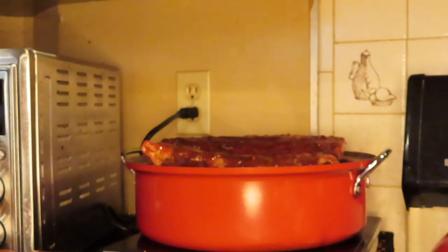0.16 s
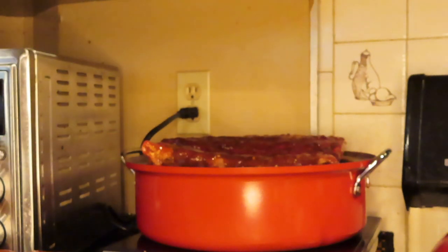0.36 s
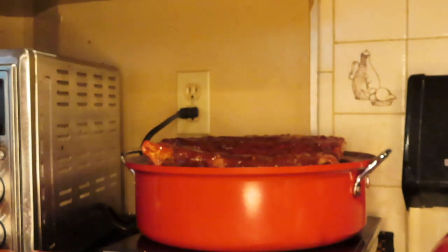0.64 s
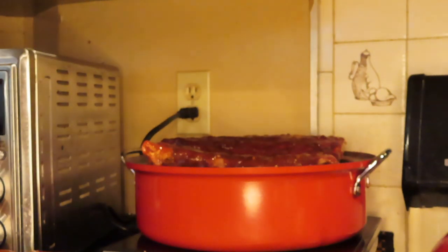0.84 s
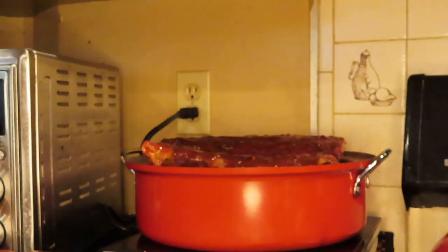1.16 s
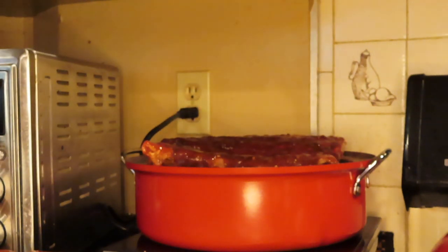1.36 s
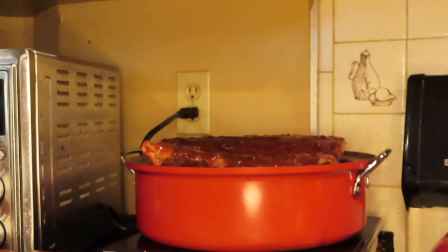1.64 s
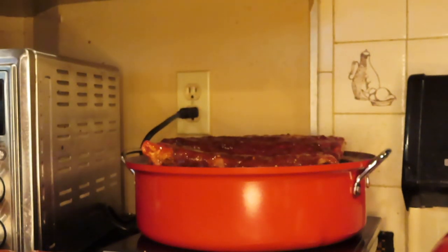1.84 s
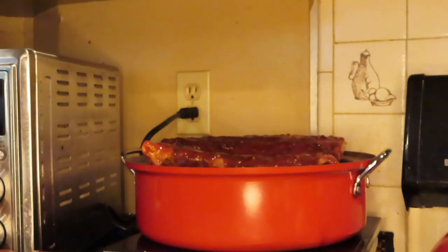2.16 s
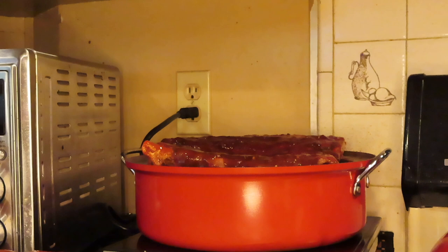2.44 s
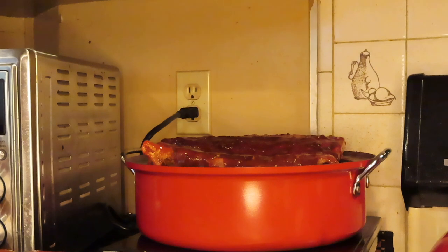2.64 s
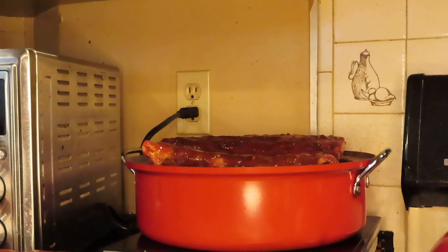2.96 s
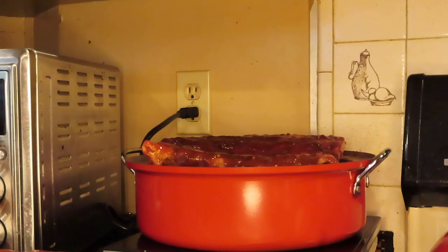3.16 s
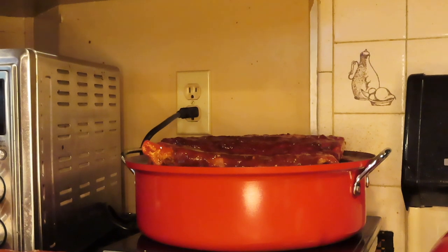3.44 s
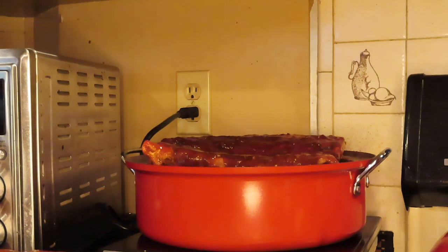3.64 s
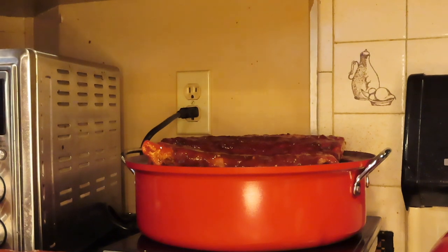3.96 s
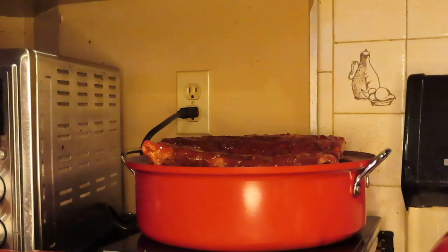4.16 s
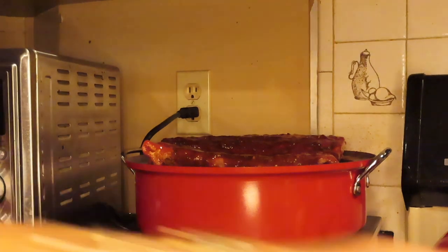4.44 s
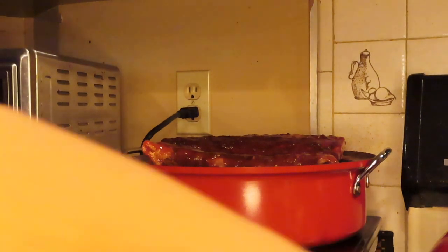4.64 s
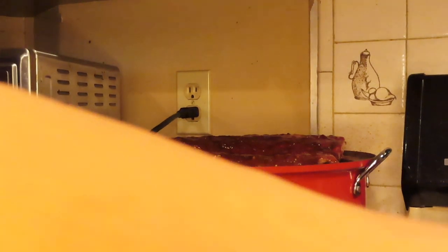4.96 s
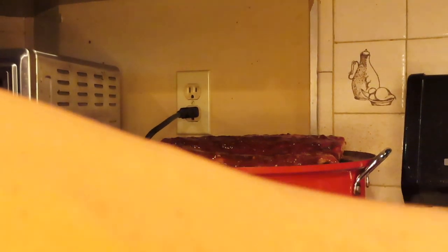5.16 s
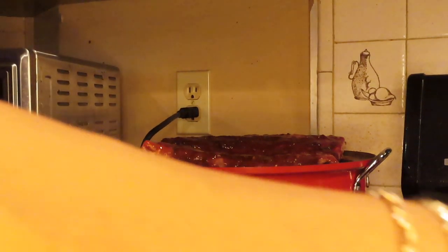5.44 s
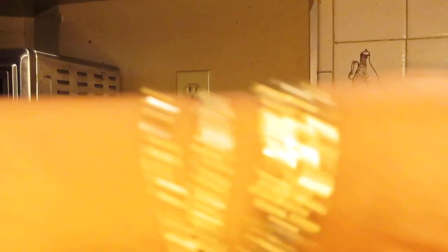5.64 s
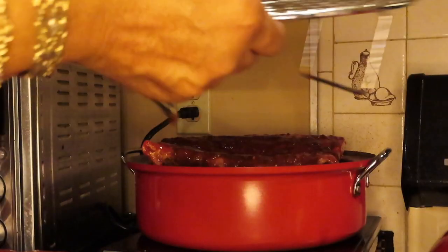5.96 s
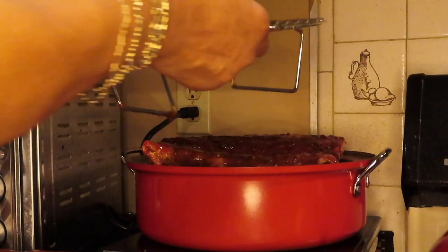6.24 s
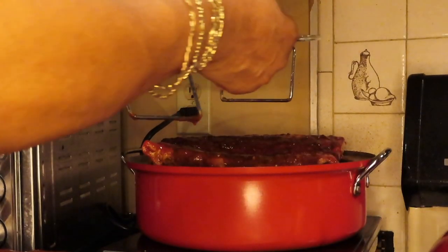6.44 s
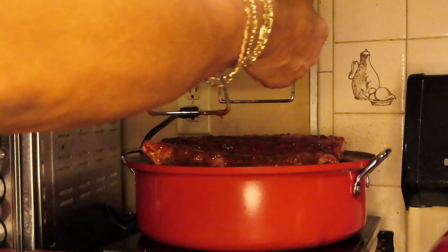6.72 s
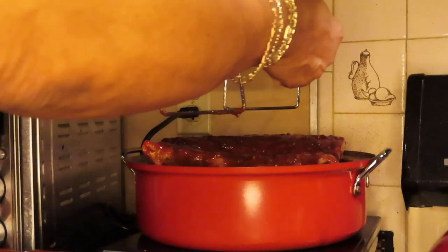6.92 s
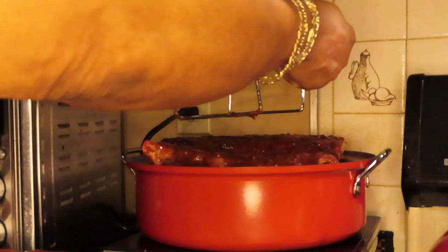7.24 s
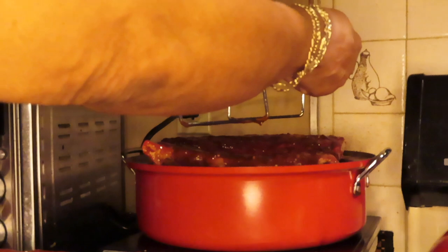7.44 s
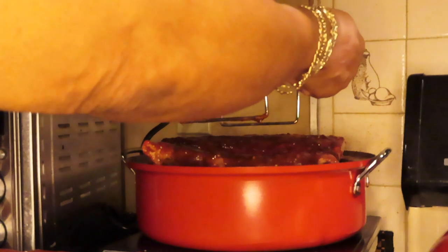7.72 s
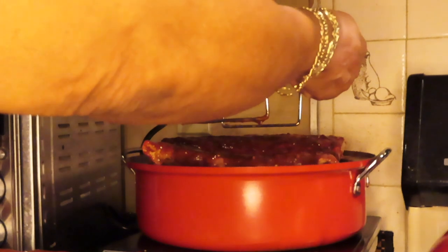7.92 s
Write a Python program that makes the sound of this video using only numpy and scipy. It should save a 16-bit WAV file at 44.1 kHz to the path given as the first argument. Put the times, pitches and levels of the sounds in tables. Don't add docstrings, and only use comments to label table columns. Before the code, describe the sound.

A low, soft fan and fridge hum runs throughout a small kitchen. Someone shifts about: woody heel knocks with short boomy thuds and gritty sole scuffs, in small groups with pauses. Just before five seconds a wire rack is dragged off a metal tray close by, clanging and chattering in quick tugs for about half a second. Then mostly hum, with a faint scuff and a last light knock. Close stereo microphones, short hard-walled echo.

```python
import sys
import numpy as np
from scipy import signal
from scipy.fft import rfft, irfft, next_fast_len
from scipy.io import wavfile
from scipy.ndimage import uniform_filter1d

SR = 44100
rng = np.random.default_rng(int(sys.argv[2]) if len(sys.argv) > 2 else 0)


def generate_wav(sig):
    pcm = np.round(np.clip(np.atleast_2d(sig).T, -1, 1) * 32767).astype(np.int16)
    wavfile.write(sys.argv[1], SR, pcm)


def invert_db(x):
    u = np.asarray(x, float) / 20
    return 10 ** u


N = 356752
SIZE = next_fast_len(N)
FREQS = np.fft.rfftfreq(SIZE, 1 / SR)

# (pitch [Hz], level [dB per Hz])
FAN_AIR = [(15, -100), (32, -81), (80, -72.5), (130, -71.5), (250, -70.5), (420, -71.5), (760, -75.5),
           (980, -77.5), (1300, -77.5), (2000, -83), (3100, -92), (4300, -95), (8000, -107), (15500, -119)]
# (pitch [Hz], side minus mid [dB])
FAN_SIDE = [(30, -29.5), (60, -25), (130, -13), (300, -11), (640, -12), (1400, -18), (3100, -6.5),
            (6800, -4), (15000, 0.5)]
# (pitch [Hz], blur width [Hz], steady level [dB], blur level [dB])
MOTOR_TONES = [(58, 15, -57, -53.5), (121.4, 14, -61.5, -57.5), (181.46, 6.4, -52.5, -51),
               (294.4, 3.6, -95, -58), (640, 10.3, -68, -79), (722, 18, -69.5, -56.5), (1187, 14, -85, -60)]
# (middle [s], length [s], level [dB], lowest pitch of the grit [Hz])
SCUFFS = [(0.02, 0.123, -66, 7000), (.87, .06, -69.5, 9000), (1.041, 0.057, -51.5, 2000),
          (1.222, 0.31, -57, 2560), (1.348, 0.16, -45.5, 2560), (1.353, 0.15, -42.5, 900),
          (1.385, 0.062, -46, 900), (1.928, 0.075, -51, 1700), (3.282, 0.096, -60, 3000),
          (3.409, 0.104, -50.5, 1500), (3.567, 0.15, -69, 8000), (4.085, 0.046, -68, 9900),
          (4.324, 0.086, -51, 1900), (4.393, 0.9, -53, 1450), (4.439, 0.087, -54, 1810),
          (4.525, 0.12, -54, 2100), (4.53, 0.15, -71, 7000), (4.335, 0.12, -70, 6500),
          (6.795, 0.096, -58, 2390), (7.429, 0.064, -58, 2780)]
# (time [s], knock [dB], board rel. to knock [dB], click rel. to knock [dB])
KNOCKS = [(.954, -23.5, -3.5, -23), (.964, -30, -27, -24), (1.036, -34.5, -12.5, -13),
          (1.919, -34, -18, -6), (2.163, -19.5, -3.5, -20), (2.168, -16.5, -15, -10),
          (2.177, -29, -23, -16), (2.184, -27.5, 0, -22), (2.193, -49, 1, -20), (2.223, -40, -11, -16),
          (3.269, -38.5, 4.5, -13), (3.315, -30, 1, -8), (3.328, -28.5, 3.5, -26), (3.388, -23.5, -14, -40),
          (3.402, -24.5, -20, -29), (4.224, -28, 2.5, -20), (4.260, -21.5, -10, -35),
          (4.271, -23, -19, -21), (4.429, -38, -8.5, 0), (7.199, -37, -7.5, -20)]
# (low [Hz], high [Hz])
KNOCK_RANGES = [(110, 326), (350, 1180), (1300, 2040), (2600, 4500)]
# (pitch [Hz], level [dB], time to fade by 60 dB [s])
FLOORBOARD = [(147, -6.5, 0.083), (264, -4.5, 0.041), (389, 0, 0.11), (620, 0, 0.11), (900, 4, 0.028),
              (1230, 2, 0.02), (1880, -2, 0.017), (2100, 3, 0.015), (3600, -5, 0.0128)]
# (time [s], pitch [Hz], level [dB])
BOOMS = [(.96, 75.5, -28.5), (2.17, 60, -27), (2.185, 30, -30), (2.176, 104, -32), (3.33, 44.8, -39),
         (4.215, 53, -31.5), (4.816, 74, -34), (4.97, 73.3, -29), (5.09, 84, -30), (5.185, 73.5, -30),
         (5.315, 68.7, -32), (4.93, 152, -23), (5.084, 141.6, -25.5), (5.184, 153, -24.5),
         (5.313, 166, -23.5)]
# (start [s], tray rel. to clang [dB], wire rel. to clang [dB], chatter decay [ms], lean to thin wires [octaves])
JOLTS = [
    (4.765, -4.5, -34, 6.6, -0.26),
    (4.81, -5, -22, 6.6, -1.2),
    (4.92, -12, -15.5, 17, 0.97),
    (5.005, -11.5, -17, 11, 0.95),
    (5.075, -12.5, -15, 12, 0.25),
    (5.175, -16, -13.5, 18, -0.55),
    (5.26, -8, -7, 7.6, 0.35),
    (5.305, -8.5, -19, 12, -.3),
]
# (time [s], clang [dB], jingle rel. to clang [dB])
CONTACTS = [(4.771, -15.5, -47), (4.782, -17, -25), (4.795, -16, -52), (4.814, -4, -13), (4.821, -6, -6.5),
            (4.833, -14.5, -24), (4.925, -9, -5.5), (4.928, -3.5, -15), (4.937, -3.5, -42),
            (4.956, -9.5, -24), (5.011, -8, -23), (5.021, -9, -27), (5.057, -14, -18), (5.080, 1, -28.5),
            (5.091, -1, -31), (5.101, -3, -6.5), (5.109, -3, -15), (5.117, 0.5, -19), (5.127, -6.5, -18),
            (5.179, 3, -45), (5.189, -5, -19), (5.197, -4.5, -27), (5.205, -3.5, -14.5),
            (5.213, -2.5, -22.5), (5.224, -17, -26), (5.265, -13, -22), (5.309, -3, -5), (5.321, -7, -9),
            (5.332, -7.5, -15), (5.339, -13, -9)]
# (low [Hz], high [Hz])
RACK_RANGES = [(260, 587), (560, 2540), (3700, 4980), (5600, 12900)]
# (pitch [Hz], level [dB], time to fade by 60 dB [s])
RACK = [(202.6, -4, 0.073), (299.9, -2.5, 0.098), (435.2, -2.5, 0.091), (548, -3.5, 0.0475),
        (697.4, -3, 0.067), (803.2, -0.5, 0.072), (894.4, 0, 0.0457), (974.4, -4, 0.04),
        (1091.4, -2.5, 0.082), (1183, 1.5, 0.0795), (1287.2, 4, 0.0312), (1508.2, 3.5, 0.0407),
        (1627, -1, 0.094), (1759, -1.5, 0.0616), (1918.5, 1, 0.054), (2113, 1.5, 0.0562), (2300, 0, 0.0377),
        (2484, -4, 0.055), (3030, -14, 0.042), (3427, -12, 0.018), (3719, -2, 0.03), (4071.4, 4, 0.03),
        (4374, 4.5, .03), (4730, 1, 0.035), (6300, 5, 0.012), (6800, 4, 0.012), (8210, -16.5, .02),
        (9600, -3, 0.015), (10600, 4, 0.015), (12140, -7.5, .02)]
# (pitch [Hz], time to fade by 60 dB [s])
ROOM_FADE = [(100, 0.81), (500, 0.18), (2000, 0.22), (6000, 0.25), (14000, 0.092)]
# (pitch [Hz], side minus mid [dB])
ROOM_SIDE = [(100, -47), (1000, -73), (2500, -13), (5000, -5.5), (12000, 3)]
# (pitch [Hz], width [Hz], share removed [0 to 1])
HOUSING_DIPS = [(3010, 1400, 0.14), (5200, 1600, 0.27)]


def on_log(table, hz):
    f, v = np.transpose(table)
    return np.interp(np.log(np.maximum(hz, 1)), np.log(f), v)


def band(x, lo_hz, hi_hz):
    edges = [lo_hz, np.clip(hi_hz, 1.1 * lo_hz, .45 * SR)]
    return signal.sosfilt(signal.butter(3, edges, "band", fs=SR, output="sos"), x)


def walk(rate):
    k = int(SR / rate)
    held = np.repeat(rng.standard_normal(N // k + 1), k)
    return 1.3 * uniform_filter1d(uniform_filter1d(held, k), k)[:N]


def octave_share(hz, base_hz, k):
    octave = np.log2(np.maximum(hz, 1) / base_hz)
    return np.cos(np.pi / 2 * np.clip(octave - k, -1, 1)) ** 2


def fan():
    white = rfft(rng.standard_normal((2, SIZE))) * np.sqrt(SR / 2)
    shaped = white * invert_db(on_log(FAN_AIR, FREQS))
    shaped[1] *= invert_db(on_log(FAN_SIDE, FREQS))
    out, swell = 0, walk(0.22)
    for k in range(-1, 10):
        breath = invert_db(0.3 * swell + 0.65 * walk(5.095))
        out = out + irfft(shaped * octave_share(FREQS, 30, k), SIZE)[:, :N] * breath
    turning = np.cumsum(1 + 0.00383 * walk(3)) / SR
    for hz, width, steady_db, blur_db in MOTOR_TONES:
        peak = 1 / (1 + (2 * (FREQS - hz) / width) ** 2)
        blur = irfft(rfft(rng.standard_normal(SIZE)) * peak, SIZE)[:N]
        out[0] += invert_db(blur_db) * blur / blur.std()
        out[0] += invert_db(steady_db) * np.sqrt(2) * np.sin(2 * np.pi * hz * turning)
    mid, side = out
    return np.array([mid + side, mid - side]) * invert_db(np.array([[-.15], [.15]]))


def scuffs():
    even_span, top_hz = 0.97, 15100
    out, t = np.zeros(N), np.arange(N) / SR
    for s, length, db, lo_hz in SCUFFS:
        near = np.abs(t - s) < .3
        count = near.sum()
        grain_db = 4 * np.repeat(rng.standard_normal(count // 40 + 1), 40)[:count]
        grit = rng.standard_normal(count) * invert_db(grain_db)
        thin = signal.butter(2, min(even_span * lo_hz, .45 * SR), fs=SR, output="sos")
        grit = signal.sosfilt(thin, band(grit, lo_hz, top_hz))
        swell = np.cos(np.pi * np.clip((t[near] - s) / length, -.5, .5)) ** 2
        out[near] += invert_db(db) * grit / grit.std() * swell
    return out


def strike(modes, decay_ms, rate, crack_db, detune):
    t = np.arange(SR // 8) / SR
    hz, db, t60 = np.repeat(modes, 3, axis=0).T[:, :, None]
    draw = rng.standard_normal((2, len(hz), 1))
    rings = invert_db(db) * draw[0] * np.sin(2 * np.pi * hz * (1 + detune * draw[1]) * t)
    ring = (rings * np.exp(-np.log(1000) * t / t60)).sum(axis=0)
    touch = rng.random((2, len(t)))
    rebounds = (touch[0] < rate / SR) * touch[1] ** 2 * 0.49
    rebounds *= np.exp(-t * 1000 / np.clip(decay_ms, 1, 60))
    rebounds[0] = 1
    contact = signal.lfilter([1], [1, -np.exp(-1 / (.0008 * SR))], rebounds)
    crack = invert_db(crack_db) * contact * rng.standard_normal(len(t))
    fade_out = np.hanning(2 * len(t))[len(t):]
    return (ring + crack) * fade_out


def blows(table, ranges, modes, rate, crack_db, detune, attack_ms, trim_db):
    lean_hz = 1200
    out = np.zeros(2 * N)
    for s, db, first_db, second_db, third_db, decay_ms, lean in table:
        blow = strike(modes, decay_ms, rate, crack_db, detune)
        blow = blow * (1 - np.exp(-np.arange(len(blow)) * 1000 / (SR * attack_ms)))
        zero, pole = np.exp(-2 * np.pi * lean_hz * 2. ** np.array([0, lean]) / SR)
        blow = signal.lfilter([1, -zero], [1, -pole], blow)
        at = int(s * SR)
        for (lo, hi), rel_db in zip(ranges, (first_db, 0, second_db, third_db)):
            part = band(blow, lo, hi)
            out[at:at + len(part)] += part / np.abs(part).max() * invert_db(db + rel_db + trim_db)
    return out[:N]


def heels():
    tick_db, tick_per_click, chatter_ms = 4, 0.43, 7
    rows = [(s, db, board_db, tick_db + tick_per_click * click_db, click_db, chatter_ms, 0)
            for s, db, board_db, click_db in KNOCKS]
    return blows(rows, KNOCK_RANGES, FLOORBOARD, rate=3400, crack_db=29.0, detune=0.086,
                 attack_ms=0.6, trim_db=-4.5)


def booms():
    longest_s, most_cycles = .36, 24
    out, t = np.zeros(N), np.arange(SR // 2) / SR
    for s, hz, db in BOOMS:
        t60 = min(longest_s, most_cycles / hz)
        envelope = (1 - np.exp(-t * hz)) * np.exp(-np.log(1000) * t / t60)
        at = int(s * SR)
        out[at:at + len(t)] += invert_db(db) * envelope * np.sin(2 * np.pi * hz * t)
    return out


def rack_contacts():
    wire_per_jingle, tray_per_jingle, usual_jingle_db = 0.56, -0.13, -17.5
    settle_gap_s, settle_db, settle_tray_db = .016, -5, 1.5
    rows = []
    ends = [jolt[0] for jolt in JOLTS][1:] + [np.inf]
    for (start, tray_db, wire_db, decay_ms, lean), end in zip(JOLTS, ends):
        hits = [(s, db, jingle_db, 0) for s, db, jingle_db in CONTACTS if start <= s < end]
        s, db, jingle_db, _ = hits[-1]
        hits += [(s + k * settle_gap_s, db + k * settle_db, jingle_db, k) for k in (1, 2)]
        for s, db, jingle_db, k in hits:
            sharp = jingle_db - usual_jingle_db
            clang_db = db if s < end else -99
            hit_tray_db = tray_db + tray_per_jingle * sharp + k * settle_tray_db
            hit_wire_db = wire_db + wire_per_jingle * sharp
            rows.append((s, clang_db, hit_tray_db, hit_wire_db, jingle_db, decay_ms, lean))
    return rows


def rack():
    rows = rack_contacts()
    out = 0
    for k in range(2):
        place = blows(rows[k::2], RACK_RANGES, RACK, rate=1100, crack_db=28, detune=0.033,
                      attack_ms=0.25, trim_db=-2.5)
        out = out + kitchen(place, wet_db=-2.5, lag_s=2.6e-5, pan_db=-1.0)
    return out


def kitchen(x, wet_db, lag_s, pan_db):
    size = 2 ** 14
    t, hz = np.arange(size) / SR, np.fft.rfftfreq(size, 1 / SR)
    noise = rfft(rng.standard_normal((2, size)))
    noise[1] *= invert_db(on_log(ROOM_SIDE, hz))
    echoes = 0
    for k in range(9):
        fade = invert_db(-60 * t / on_log(ROOM_FADE, 60 * 2 ** k))
        echoes = echoes + irfft(noise * octave_share(hz, 60, k), size) * fade
    echoes *= 1 - np.exp(-t / 0.0013)
    mid, side = rfft(echoes * invert_db(wet_db) / np.sqrt((echoes[0] ** 2).sum()), SIZE)
    late = np.exp(-2j * np.pi * FREQS * lag_s)
    ears = irfft(rfft(x, SIZE) * np.array([late + mid + side, 1 + mid - side]), SIZE)[:, :N]
    return ears * invert_db(np.array([[pan_db], [-pan_db]]) / 2)


def scene():
    feet = kitchen(heels() + scuffs(), wet_db=-5, lag_s=1e-5, pan_db=0.6)
    return fan() + feet + booms() + rack()


def band_limit(x):
    return signal.sosfilt(signal.butter(12, 15660, fs=SR, output="sos"), x)


def record(dry):
    for hz, width, share in HOUSING_DIPS:
        peak = signal.lfilter(*signal.iirpeak(hz, hz / width, fs=SR), dry)
        dry = dry - np.clip(share, 0, 1) * peak
    memory = .25 * SR
    loud = signal.lfilter([1 / memory], [1, 1 / memory - 1], np.abs(dry).mean(axis=0))
    ducked = dry / (1 + loud / 0.96)
    ducked = signal.sosfilt(signal.butter(6, 15400, fs=SR, output="sos"), ducked)
    mix = np.tanh(0.58 * ducked) / 0.52
    return band_limit(mix)


dry = scene()
out = record(dry)
generate_wav(out)
```